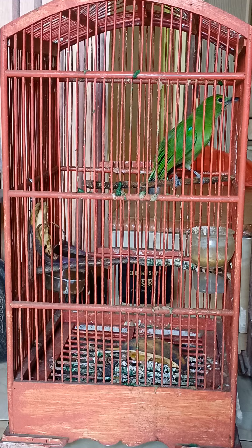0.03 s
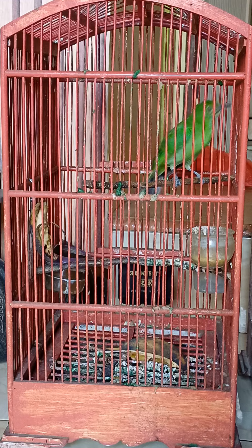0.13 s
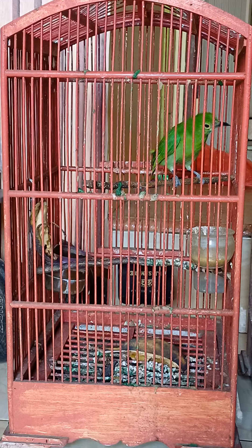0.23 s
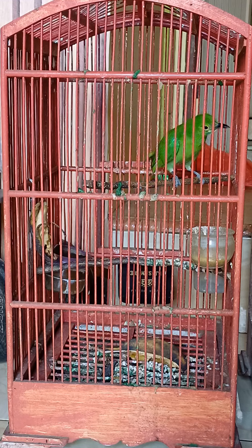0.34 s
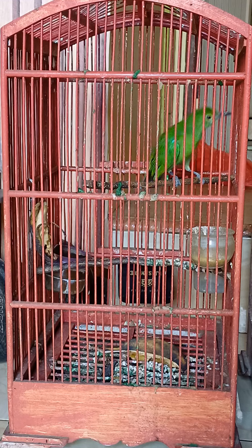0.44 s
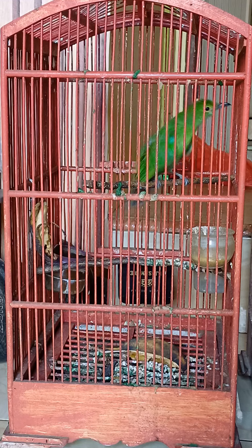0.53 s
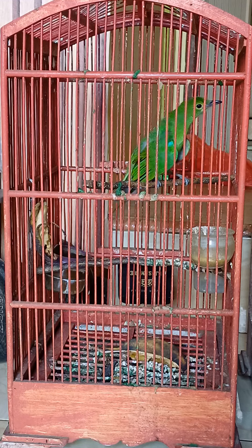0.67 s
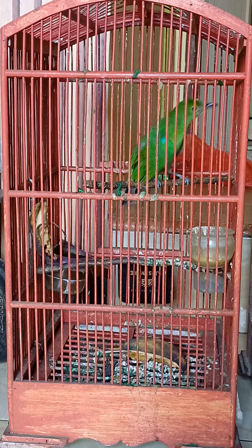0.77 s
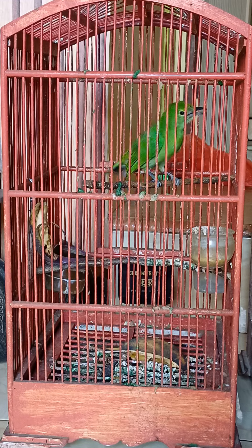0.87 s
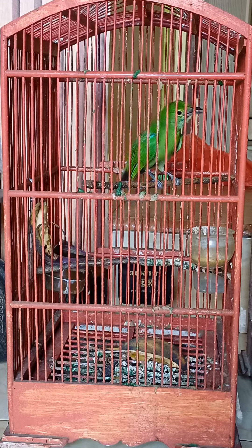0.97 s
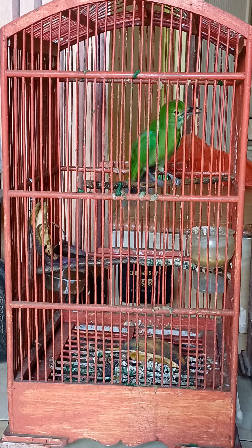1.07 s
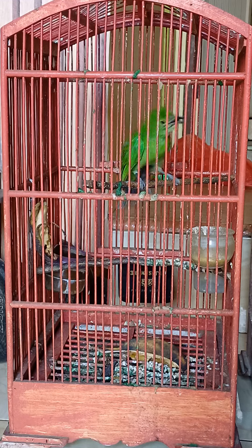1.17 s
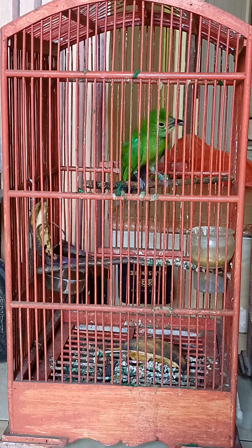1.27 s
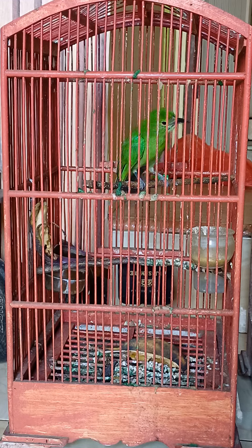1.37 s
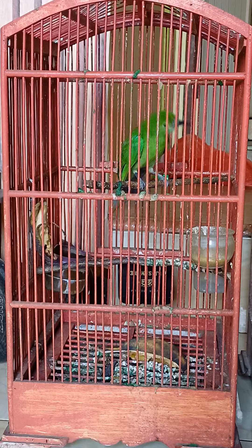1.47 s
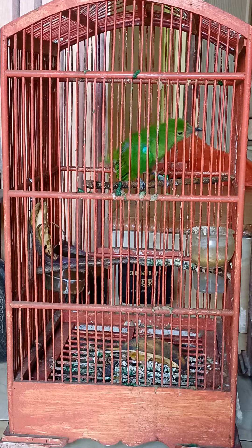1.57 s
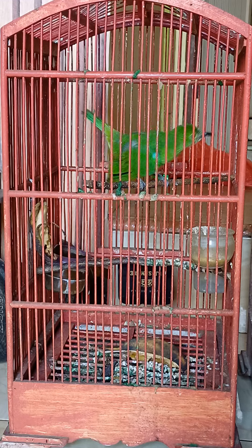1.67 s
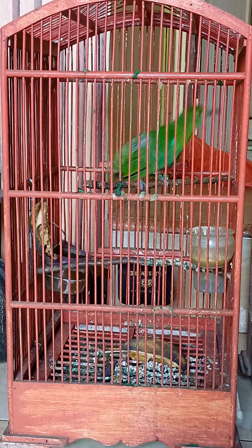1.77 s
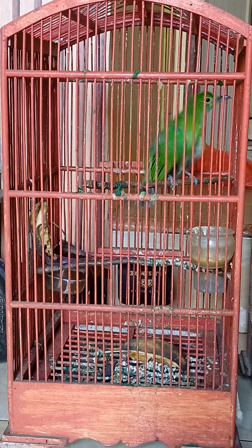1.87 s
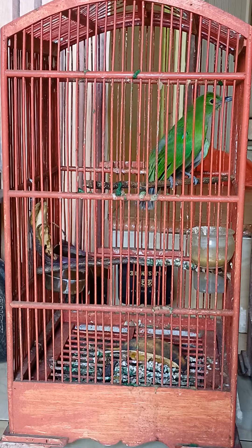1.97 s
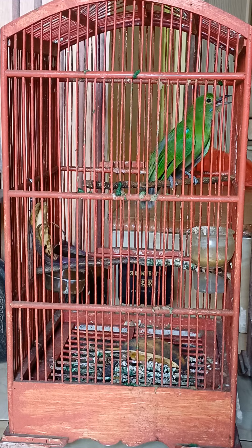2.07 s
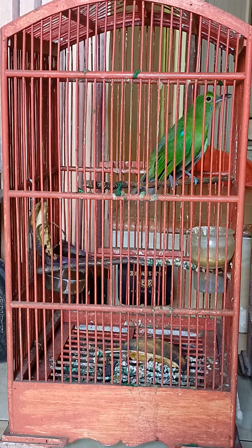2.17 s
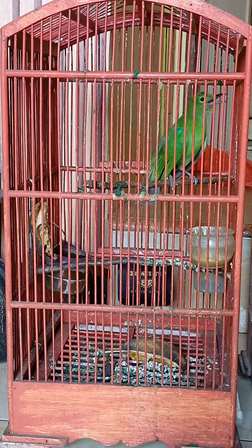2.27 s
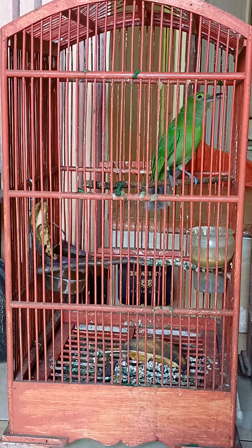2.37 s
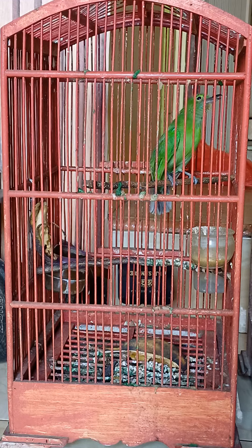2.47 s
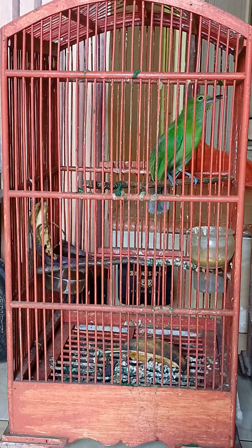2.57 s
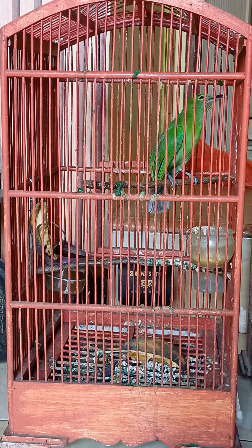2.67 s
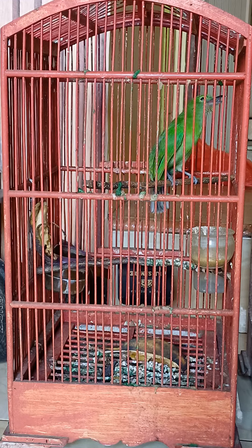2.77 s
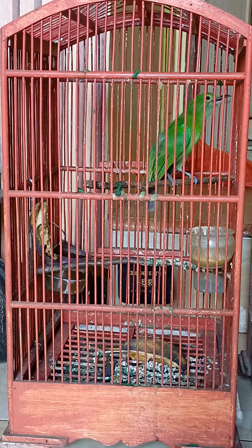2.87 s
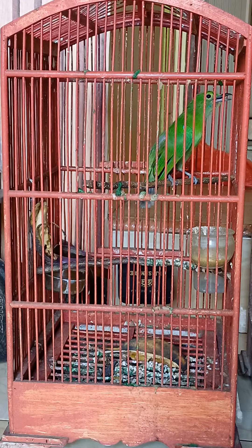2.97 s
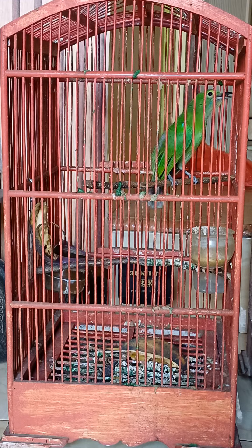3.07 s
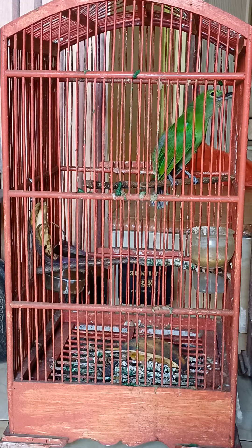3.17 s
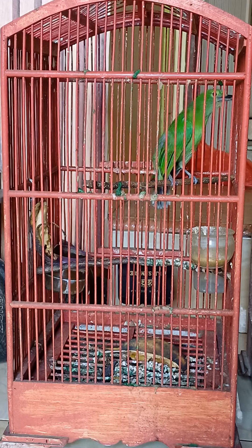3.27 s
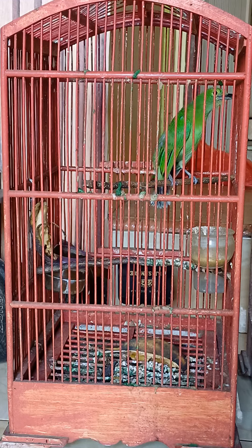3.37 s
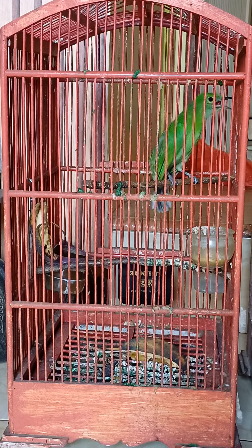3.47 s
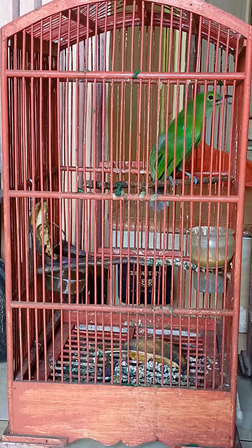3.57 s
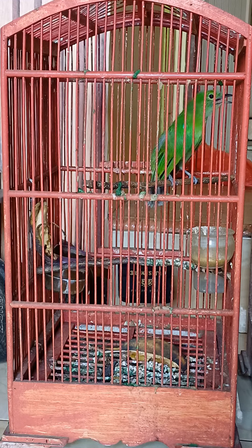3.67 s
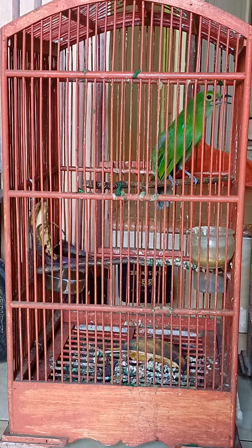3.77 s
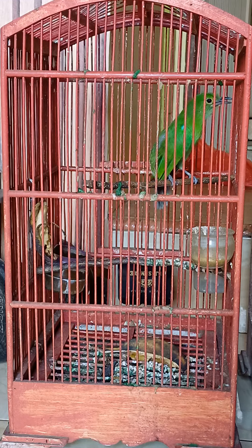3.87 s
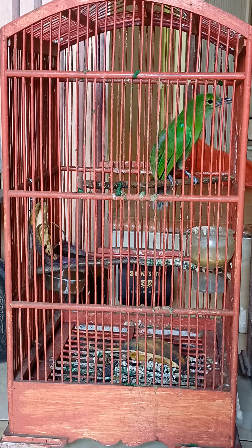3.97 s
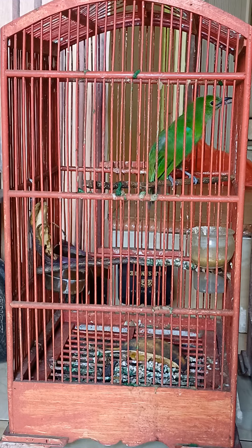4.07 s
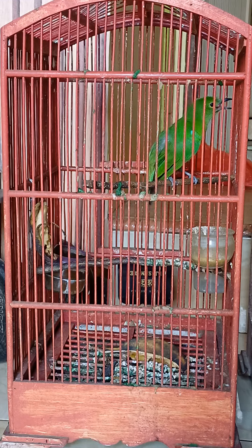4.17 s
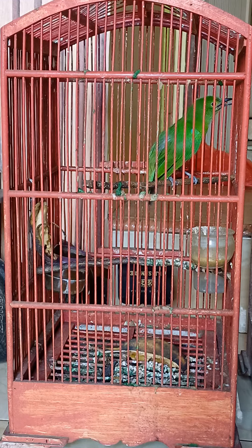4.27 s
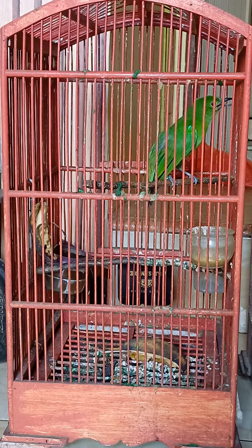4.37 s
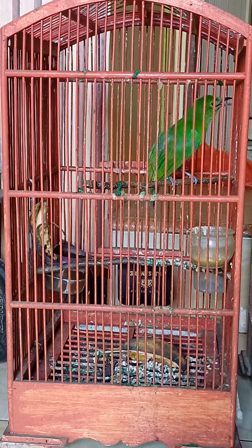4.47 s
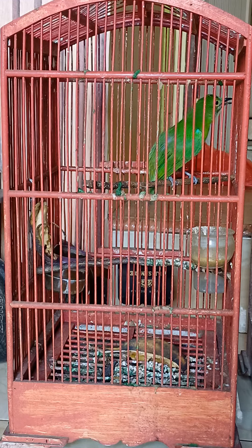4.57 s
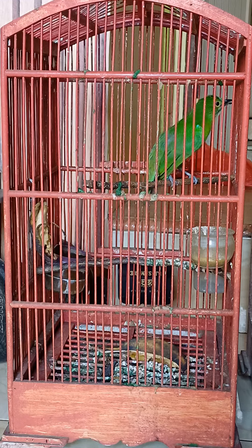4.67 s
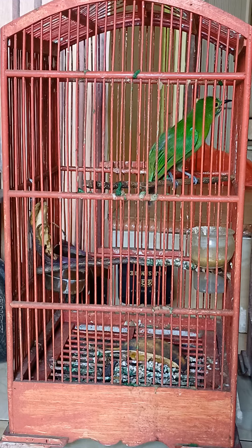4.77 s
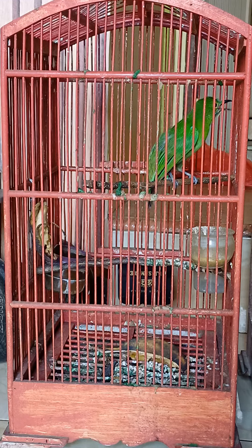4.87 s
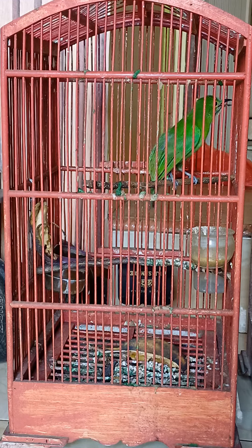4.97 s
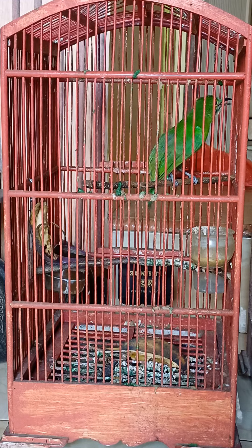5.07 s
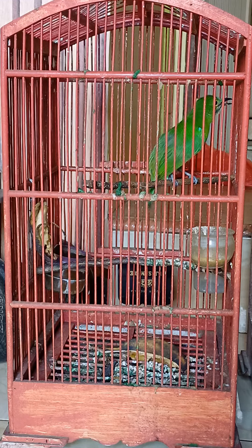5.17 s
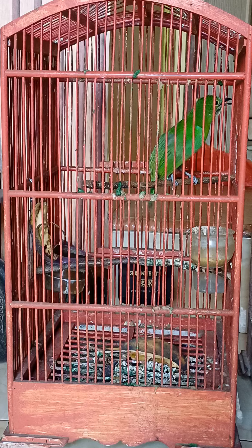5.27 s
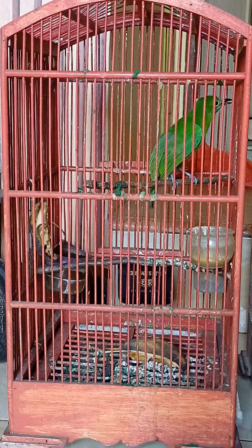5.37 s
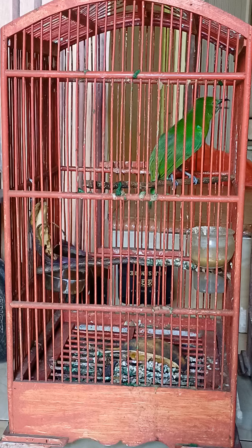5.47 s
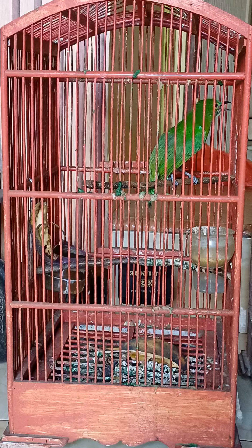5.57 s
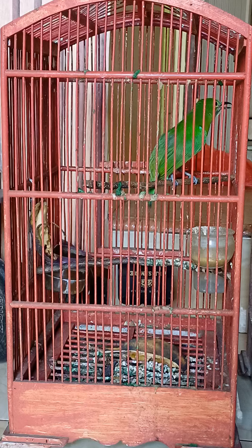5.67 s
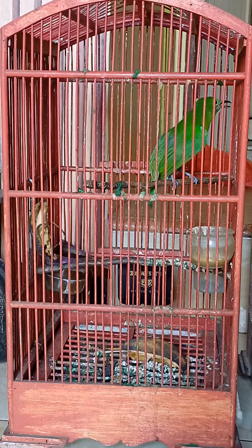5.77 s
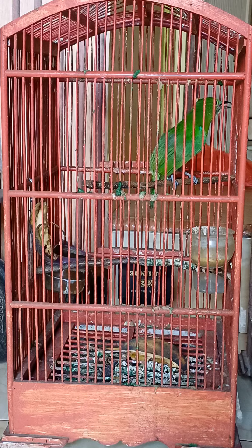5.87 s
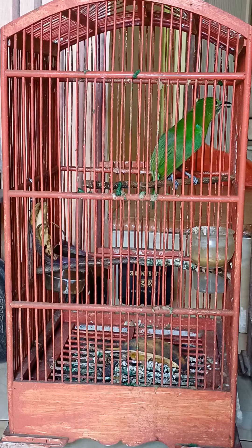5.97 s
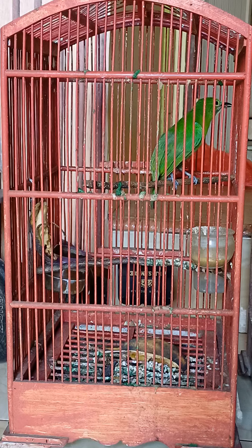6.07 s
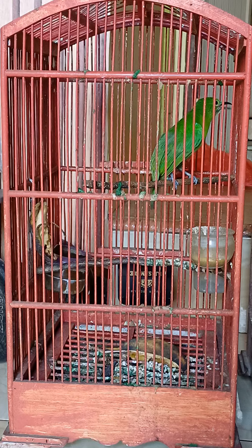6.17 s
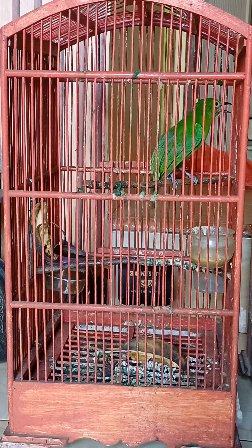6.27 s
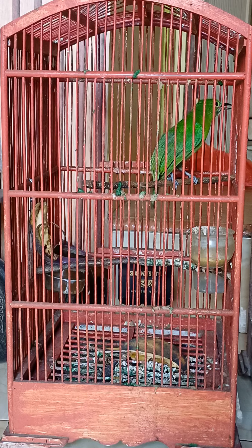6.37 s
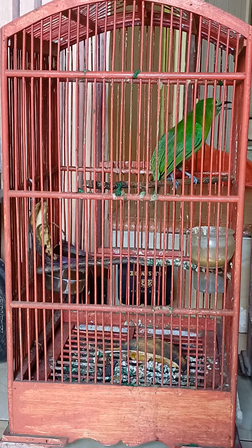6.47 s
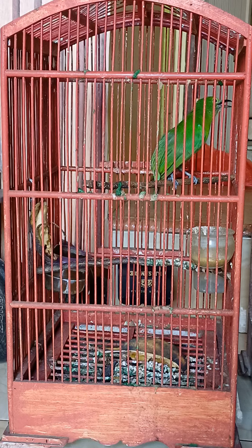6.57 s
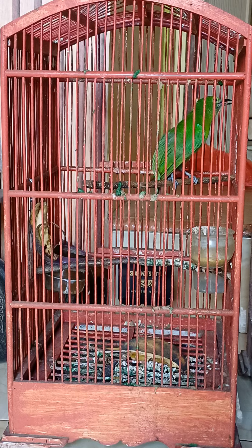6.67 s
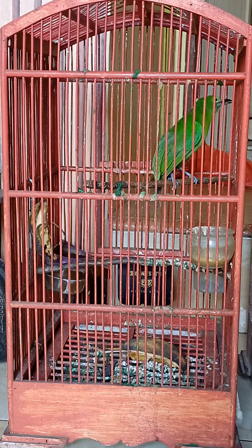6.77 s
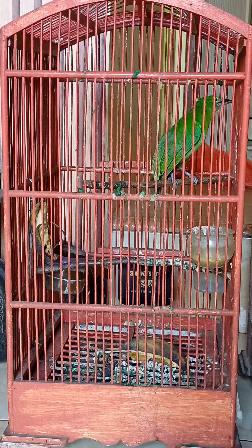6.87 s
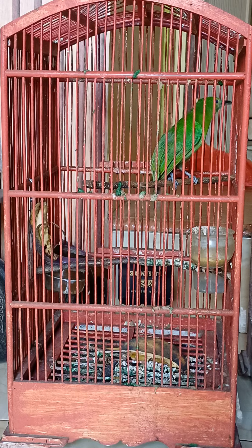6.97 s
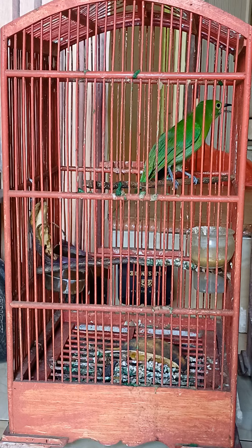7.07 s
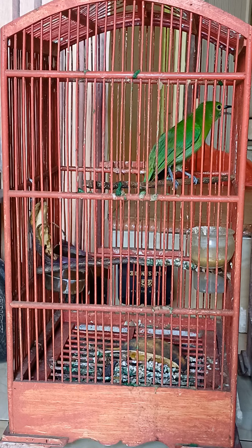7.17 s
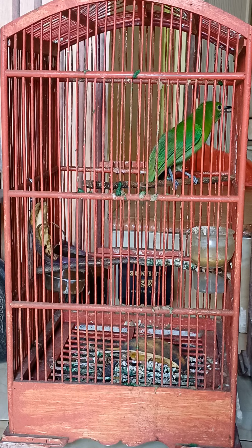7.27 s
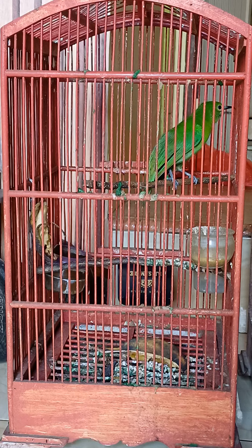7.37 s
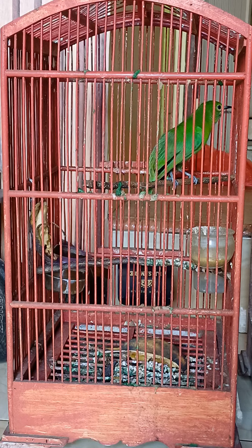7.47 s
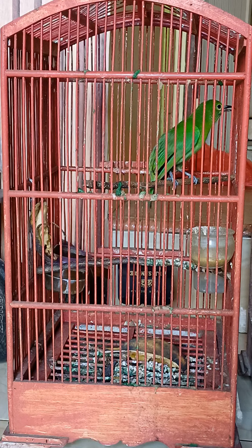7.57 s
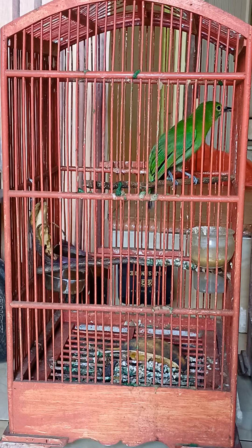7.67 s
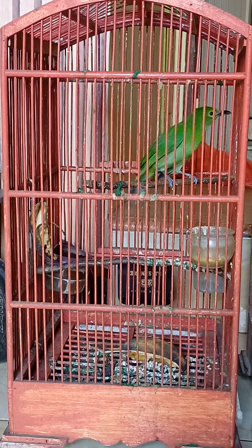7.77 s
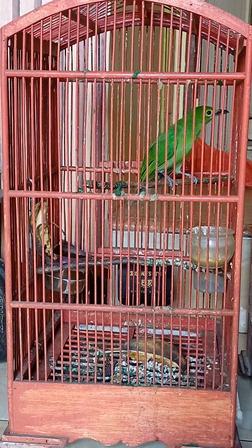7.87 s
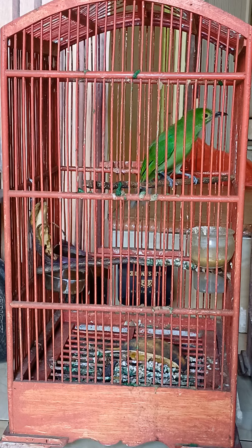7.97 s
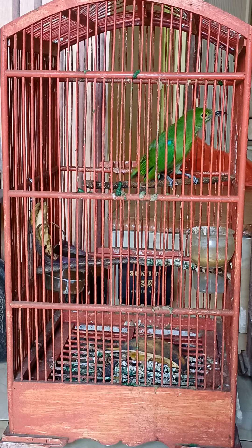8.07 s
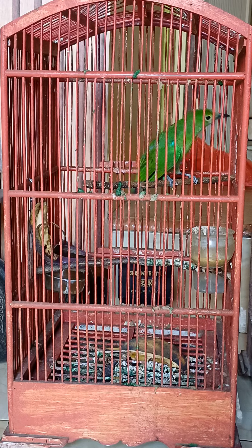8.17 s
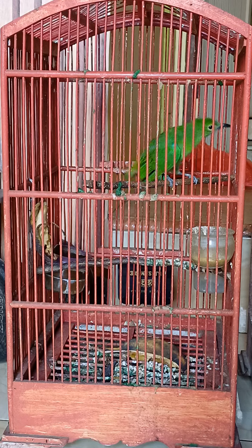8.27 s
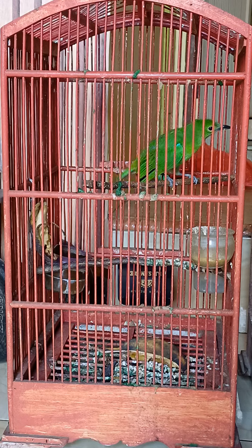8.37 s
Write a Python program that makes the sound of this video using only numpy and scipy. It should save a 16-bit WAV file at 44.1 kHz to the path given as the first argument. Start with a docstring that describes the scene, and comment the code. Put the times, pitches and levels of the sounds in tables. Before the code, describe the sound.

Close, sharp songbird phrases, each a buzz, a short chirp and a falling whistle, repeat steadily with a slight porch echo.

```python
"""A caged songbird, close to the microphone by a house wall, repeats one phrase: a rising buzz from
both sides of its syrinx, a short harsh chirp, then a clear whistled flourish. The porch rings after
each note, an earlier call dies away at the start, and a claw taps the perch. Far traffic hums below,
with a faint hiss. The microphone is a small one with a bright treble peak; the loudest notes
overload it, with a soft low thump in each whistle's slide."""
import sys
import numpy as np
from scipy import signal
from scipy.fft import rfft, irfft
from scipy.io import wavfile
from scipy.ndimage import uniform_filter1d

SR = 44100
rng = np.random.default_rng(int(sys.argv[2]) if len(sys.argv) > 2 else 0)


def int16_out(signal):
    """Quantize to a 16-bit WAV file."""
    q = np.round(np.clip(np.atleast_2d(signal).T, -1, 1) * 32767)
    wavfile.write(sys.argv[1], SR, q.astype(np.int16))


N = 371322


def amp(db):
    """Decibels to amplitude."""
    return 10 ** (np.asarray(db) / 20)


def at_hz(points, hz):
    """Read a (Hz, value) table on a log-frequency axis."""
    p = np.array(points)
    return np.interp(np.log(np.maximum(hz, 1)), np.log(p[:, 0]), p[:, 1])


def read(rows, at):
    """Interpolate a table's other columns along its first."""
    place, *columns = np.transpose(rows)
    return [np.interp(at, place, c) for c in columns]


def colour(x, spectrum):
    """Shape a sound by a (Hz, dB) table."""
    return irfft(rfft(x) * amp(at_hz(spectrum, np.fft.rfftfreq(len(x), 1 / SR))), len(x))


def noise(spectrum, n):
    """Noise of the given colour, rms 1."""
    x = colour(rng.standard_normal(n), spectrum)
    return x / x.std()


def narrow_noise(hz, width):
    """A narrow band of noise, rms 1."""
    band = signal.butter(2, [hz - width / 2, hz + width / 2], "band", fs=SR, output="sos")
    x = signal.sosfilt(band, rng.standard_normal(N + SR))[SR:]
    return x / x.std()


def wobble(n, hz):
    """Random drift, mostly slower than hz, with spread 1."""
    lowpass = signal.butter(2, hz, fs=SR, output="sos")
    x = signal.sosfilt(lowpass, rng.standard_normal(n + 2000))[2000:]
    return x / x.std()


def phase(hz):
    """Running phase of a pitch curve, from a random start."""
    return 2 * np.pi * (np.cumsum(hz) / SR + rng.random())


def add(out, start, x, fade_s=0.0018):
    """Mix a sound in with soft ends."""
    i, t = round(start * SR), np.arange(len(x)) / SR
    out[i:i + len(x)] += x * np.clip(np.minimum(t, t[::-1]) / fade_s, 0, 1)


# The far road, heard from the porch. Each row: time in seconds, level in dB.
TRAFFIC_LEVEL = [(0.0, -52.5), (0.52, -64), (0.96, -57), (1.1, -50.5), (1.43, -52), (1.85, -47.5),
                 (2.44, -51), (2.86, -49.5), (3.12, -54), (5.18, -56.5), (6.38, -54), (6.71, -56.5),
                 (7.2, -52), (8.42, -57)]
# The faint hiss behind the bird. Each row: time in seconds, level in dB.
HISS_LEVEL = [(0, -55.5), (.3, -67.5), (.6, -75), (.9, -73), (1.5, -62), (2.1, -60.5), (3, -61), (8, -64),
              (8.42, -73.5)]
# Colours of traffic, rumble and hiss. Each row: frequency in Hz, relative density in dB.
TRAFFIC_SPECTRUM = [(74, -30.5), (125, -17.5), (151, 1), (193, -4), (274, -5), (337, -4), (387, -6),
                    (750, -8), (1530, -11), (2920, -16.5), (8000, -36), (10400, -63.5), (17600, -120)]
RUMBLE_SPECTRUM = [(15, -32), (25, -17), (81, -1), (125, -2.5), (160, -44.5), (280, -120)]
HISS_SPECTRUM = [(1760, -30), (3000, -2.5), (5250, 2), (14200, -2.5), (15100, -25), (16000, -28)]
# One distant engine. Each row: centre in Hz, width in Hz, dB against the traffic when near, when far.
ENGINE_BANDS = [(153, 8, -6, -8), (186, 10, -11, -11), (275, 6, -8, -22), (318, 7, -9, -20),
                (392, 10, -12, -22)]
# Times in seconds at which it starts to approach, is near, starts to leave and is far again.
ENGINE_PASS_S = (1.2, 1.6, 2.7, 3.3)


def outdoors():
    """Far traffic with one passing engine, a rumble that partly follows its swell, and hiss."""
    t = np.arange(N) / SR
    traffic_db, = read(TRAFFIC_LEVEL, t)
    hiss_db, = read(HISS_LEVEL, t)
    engine = sum(amp(np.interp(t, ENGINE_PASS_S, [far, near, near, far])) * narrow_noise(hz, width)
                 for hz, width, near, far in ENGINE_BANDS)
    rumble_db = -61.5 + 0.6 * (traffic_db - traffic_db.mean()) + 2.5 * wobble(N, 5)
    traffic = amp(traffic_db + 0.57 * wobble(N, 8.8)) * (noise(TRAFFIC_SPECTRUM, N) + engine)
    rumble = amp(rumble_db) * noise(RUMBLE_SPECTRUM, N)
    return rumble + traffic + amp(hiss_db) * noise(HISS_SPECTRUM, N)


# A call still ringing in the porch. Each row: centre in Hz, width in Hz, level in dB,
# seconds to fall 60 dB.
RINGING_BANDS = [(2958, 26, -30, 0.46), (2780, 460, -44.5, 0.53), (4650, 570, -35.5, 0.51),
                 (5170, 120, -39, 0.29)]


def earlier_call():
    """Narrow bands of reverberation, already decaying."""
    t = np.arange(N) / SR
    return sum(amp(db - 60 * t / t60) * narrow_noise(hz, width) for hz, width, db, t60 in RINGING_BANDS)


# Faint taps inside the cage. Each row: start in seconds, level in dB, ring pitch in Hz.
CLAW_TAPS = [(.655, -46, 244), (7.856, -40.5, 238), (7.941, -43, 450)]


def claw_taps():
    """A claw knocks the perch: a low ring under a brief scratch."""
    out, t = np.zeros(N), np.arange(2000) / SR
    for start, db, hz in CLAW_TAPS:
        ring = np.sin(2 * np.pi * hz * t) * amp(-60 * t / 0.12)
        scratch = 0.42 * wobble(len(t), 3000) * amp(-60 * t / 0.0354)
        add(out, start, amp(db) * (ring + scratch))
    return out


def membranes(angle, harmonics_db, bright_db, flicker_db):
    """The membranes close unevenly, adding flickering harmonics; bright_db acts from the third up."""
    tone = 0
    for k, db in enumerate(harmonics_db):
        flicker = flicker_db * min(k / 2, 1) * wobble(len(angle), 70)
        tone += amp(db + bright_db * (k > 1) + flicker) * np.sin((k + 1) * angle)
    return np.sqrt(2) * tone


# The bird's breath, heard close. Each row: frequency in Hz, relative density in dB.
BREATH_SPECTRUM = [(1000, -50.5), (1700, -24.5), (4000, 14), (6000, -5), (8000, -8), (12000, -19),
                   (16000, -12)]


def breath():
    """Air rushing past the syrinx, the rasp in every note."""
    return noise(BREATH_SPECTRUM, N)


# The two sides of the syrinx in a buzz. Each row: seconds into the voice, base pitch in Hz,
# warble depth in Hz, relative level in dB.
UPPER_VOICE = [(0, 2087, 102, -29), (.007, 2862, 260, -12), (.018, 3397, 370, -4.5),
               (.035, 3850, 420, -1.3), (.06, 4388, 480, -0.5), (.09, 5000, 497.3, -4.5),
               (.12, 5453, 470, -9.5), (.15, 5650, 450, -6.5)]
LOWER_VOICE = [(0, 1590, 79.5, -27.5), (.012, 1782, 110.7, -7.5), (.04, 2000, 130, -2),
               (.055, 2600, 169.2, -5.5), (.066, 3345, 100, -3.5), (.095, 3700, 71.2, 0.2),
               (.15, 3913, 80, -3.8)]
# Their harmonics in dB, fundamental first.
UPPER_HARMONICS = [0, -31.5, -40.5]
LOWER_HARMONICS = [4, -21, -25, -30.5]
# The buzz that opens each phrase. Each row: start and length in seconds, upper pitch factor, upper and
# lower level in dB, warbles per second at onset, brightness in dB, top treble at the microphone in dB.
BUZZES = [(0.906, 0.06, 0.95, -7, -24, 152, 1, -11.5), (2.124, 0.07, 0.92, -7.5, -25, 175, -0.5, -4),
          (2.829, 0.14, 0.89, -7, -19.5, 133, 3.5, -7), (3.49, 0.15, 0.94, -7, -18.5, 156, 1.5, 10.5),
          (4.165, 0.13, 0.93, -6.5, -19, 169, 3.5, -1), (4.841, 0.14, 0.92, -6, -20.5, 157, 5, -2),
          (5.525, 0.14, 0.92, -6.5, -21, 140, 5, 0.5), (6.262, 0.15, 0.92, -7.5, -22, 142, 4, -6),
          (7.127, 0.15, 0.93, -10, -20.5, 183, 1, -5)]
TREMOR_SLOWING_HZ_PER_S, LOWER_DELAY_S, JUMP_DB, BUZZ_FADE_S = 250, 0.0055, 4.5, 0.018


def buzzes(rasp):
    """Both sides of the syrinx climb; a fast tremor swings the upper, the lower jumps and strengthens."""
    out = np.zeros(N)
    for start, length, pitch, upper_db, lower_db, tremor_hz, bright_db, _ in BUZZES:
        t = np.arange(round(length * SR)) / SR
        slowing_hz = tremor_hz - TREMOR_SLOWING_HZ_PER_S * t
        tremor = np.sin(phase(slowing_hz * (1 + 0.07 * wobble(len(t), 60))))
        upper_hz, upper_depth, upper_shape_db = read(UPPER_VOICE, t)
        lower_hz, lower_depth, lower_shape_db = read(LOWER_VOICE, t - LOWER_DELAY_S)
        jump_db = np.interp(lower_hz, [2200, 3200], [0, JUMP_DB])
        upper_level = amp(upper_db + upper_shape_db + 0.43 * tremor + 2.0 * wobble(len(t), 210))
        lower_level = amp(lower_db + jump_db + lower_shape_db + 2.5 * wobble(len(t), 300))
        upper_angle = phase(pitch * upper_hz + upper_depth * (tremor + 0.17 * wobble(len(t), 400)))
        lower_angle = phase(lower_hz + lower_depth * wobble(len(t), 350))
        upper = upper_level * membranes(upper_angle, UPPER_HARMONICS, bright_db, flicker_db=-2.5)
        lower = lower_level * membranes(lower_angle, LOWER_HARMONICS, bright_db, flicker_db=3)
        # a faint tone at the sum of the two pitches
        sum_level = amp(-19.5 + 4.5 * wobble(len(t), 80)) * np.sqrt(upper_level * lower_level)
        sum_tone = sum_level * np.sin(upper_angle + lower_angle)
        air_level = (upper_level + lower_level) * amp(-21 + bright_db + 1.9 * tremor)
        air = air_level * rasp[round(start * SR):][:len(t)]
        fade = np.clip((length - t) / BUZZ_FADE_S, 0, 1)
        add(out, start, (upper + lower + sum_tone + air) * fade)
    return out


# High hiss on buzzes and chirps: centre in Hz, width in Hz, level against the note in dB.
SHEEN_BAND = (14600, 1600, -35.5)


def sheen(voice):
    """A thin, flickering hiss that follows the loudness of the voice."""
    hz, width, db = SHEEN_BAND
    envelope = uniform_filter1d(np.abs(voice), size=200)
    return amp(db + 4.9 * wobble(N, 40)) * envelope * narrow_noise(hz, width)


# The arch of a chirp. Each row: share of its length, base pitch in Hz, relative level in dB.
CHIRP_SHAPE = [(0, 1200, -17), (.1, 1445, -6), (.3, 1685, -0.7), (.55, 1840, 0.7), (.8, 1865, -3.2),
               (1, 1713, -20.5)]
# Its harmonics in dB, fundamental first.
CHIRP_HARMONICS = [-13, 2, -21.5, -32.5, -35.5, -41, -48, -46]
# The chirp in mid-phrase. Each row: start and length in seconds, pitch factor, level in dB,
# swell from onset to end in dB, warble depth in Hz, brightness in dB.
CHIRPS = [(1.068, 0.062, 0.98, -10, 5.6, 80.4, -2.1), (2.318, .066, 1.007, -7, -3.5, 100, -0.3),
          (3.038, 0.069, 0.97, -11, 4, 40, 0), (3.691, 0.06, 0.97, -13.5, 7.5, 50, 1.5),
          (4.373, 0.06, 0.96, -14.5, 9.5, 50, 4), (5.052, 0.063, 0.95, -15, 9.5, 60, 5.5),
          (5.755, .064, .98, -12.5, 4.5, 60, 0.5), (6.488, 0.072, 0.96, -12.5, 2, 60.3, 3.5),
          (7.355, 0.068, 0.95, -12.5, 2, 54.8, 3.5)]
CHIRP_WARBLE_HZ = 149.6


def chirps(rasp):
    """One low, harsh voice whose second harmonic the throat favours."""
    out = np.zeros(N)
    for start, length, pitch, db, swell_db, depth_hz, bright_db in CHIRPS:
        t = np.arange(round(length * SR)) / SR
        base_hz, shape_db = read(CHIRP_SHAPE, t / length)
        warble_hz = depth_hz * np.sin(2 * np.pi * CHIRP_WARBLE_HZ * t)
        hz = pitch * base_hz + warble_hz + 36 * wobble(len(t), 400)
        air = amp(-24 + bright_db) * rasp[round(start * SR):][:len(t)]
        level = amp(db + swell_db * t / length + shape_db + 1.5 * wobble(len(t), 190))
        tone = membranes(phase(hz), CHIRP_HARMONICS, bright_db, flicker_db=-0.5)
        add(out, start, level * (tone + air))
    return out


# A whistle's two parts. Each row: place (0 onset, 1 top, 2 dip, 3 end), base pitch in Hz,
# relative level in dB, unsteadiness from 0 to 1.
HELD_NOTE = [(0, 1913, -24, .2), (.1, 2451, -7.5, 0.087), (.18, 2558, -4, .05), (.4, 2419, -1.1, 0.038),
             (.63, 2440, -2, .05), (.72, 2242, -0.5, .3), (.8, 2238, -23.5, 0.54)]
FLOURISH = [(.88, 2786, -7, 1), (0.971, 3338, 7.5, 0.66), (1, 3542, -10, .6), (1.029, 3322, 4.5, 0.49),
            (1.149, 3060, 4.5, 0.27), (1.399, 2691, 3.5, .1), (1.518, 2514, -10, 0.4),
            (1.701, 2565, 0.5, 0.083), (1.92, 2083, -3, 0.18), (2.099, 2057, -1.5, 0.12),
            (2.379, 2534, 3, 0.23), (2.85, 2593, -3, 0.36), (3, 2510, -29, 0.99)]
# Its harmonics in dB, fundamental first.
WHISTLE_HARMONICS = [2.5, -24, -31.5, -35, -34.5, -29.5, -44]
# The whistle that ends each phrase. Each row: start in seconds, seconds from there to top, dip and end,
# pitch factor and dB of the held note, the same of the flourish, then brightness, top treble at the
# microphone and overload thump level, all in dB.
WHISTLES = [(1.173, 0.072, 0.17, 0.2, .99, -4, 1.018, -6.5, -6.5, 4.5, -37.5),
            (2.439, 0.073, 0.17, 0.22, .99, -5.5, 1.023, -7, -6.5, 11, -39),
            (3.131, 0.073, 0.17, .2, .995, -5.5, .98, -9, -7, 8, -43.5),
            (3.787, .078, .17, 0.22, 1.008, -6, 0.99, -8.5, -3.5, 5.5, -43),
            (4.474, .079, 0.17, .22, 1.008, -6, 1.001, -8, -3.5, 5.5, -40.5),
            (5.155, 0.07, .17, 0.23, 1.015, -5.5, 1.024, -9.5, -2, 4.5, -38.5),
            (5.862, 0.074, .182, 0.23, 1.001, -6.5, 1.005, -9.5, -5, -3, -40.5),
            (6.6, .08, .174, .215, .99, -5.5, 0.99, -9.5, -6.5, -1, -39),
            (7.472, 0.074, 0.16, .22, 1, -6.5, 1.015, -9, -3.5, -2, -40)]
SLIDE_PLACE, SLIDE_WIDTH, SLIDE_DB = 1.2, 0.2, 11.5   # overtones peak with the effort in the slide


def whistles(rasp):
    """One clear voice: a held note, a cracking leap, a falling slide, a dip and a short recovery."""
    out = np.zeros(N)
    for start, top, dip, end, held_pitch, held_db, leap_pitch, leap_db, tone_db, *_ in WHISTLES:
        t = np.arange(round(end * SR)) / SR
        place = np.interp(t, [0, top, dip, end], range(4))
        base_hz, shape_db, shaky = read(HELD_NOTE + FLOURISH, place)
        leapt = place > HELD_NOTE[-1][0]
        effort_db = SLIDE_DB * np.exp(-((place - SLIDE_PLACE) / SLIDE_WIDTH) ** 2)
        bright_db = tone_db + 0.4 * shape_db - 8 * shaky + effort_db
        hz = uniform_filter1d(np.where(leapt, leap_pitch, held_pitch) * base_hz, size=60)
        hz += 160 * shaky * wobble(len(t), 150)
        falter_db = 1.1 * shaky * np.abs(wobble(len(t), 150))
        level = amp(shape_db + np.where(leapt, leap_db, held_db) - falter_db)
        air = amp(-44 + 28 * shaky + bright_db) * rasp[round(start * SR):][:len(t)]
        tone = membranes(phase(hz), WHISTLE_HARMONICS, bright_db, flicker_db=5.5)
        add(out, start, level * (tone + air))
    return out


# The thump of the overloaded microphone. Each row: frequency in Hz, relative density in dB.
THUMP_SPECTRUM = [(30, -16.5), (60, 5), (150, -15), (500, -12), (1200, -35), (3000, -46)]
THUMP_AFTER_TOP_S, THUMP_S = 0.012, 0.031


def overload_thumps():
    """A soft low thump as each whistle's slide overloads the microphone, played as a burst of noise."""
    out, n = np.zeros(N), round(THUMP_S * SR)
    for start, top, *_, db in WHISTLES:
        add(out, start + top + THUMP_AFTER_TOP_S, amp(db) * np.hanning(n) * noise(THUMP_SPECTRUM, n))
    return out


# The path through windpipe and beak. Each row: frequency in Hz, gain in dB.
THROAT_RESPONSE = [(1000, -11.5), (1550, -1.5), (5000, -2), (6500, -3.5), (7500, -2.5), (8700, 0),
                   (9400, 1.5), (10300, 6.5), (11300, 7), (12800, 0.5), (13800, 6), (14700, 5),
                   (15600, -1.5)]
BEAM_HZ = 13300


def throat_and_beak(voice):
    """The throat colours the song; the top treble varies from note to note, as when the beak turns."""
    song = colour(voice, THROAT_RESPONSE)
    aims = [(start + length / 2, db) for start, length, *_, db in BUZZES]
    aims += [(start + top, db) for start, top, *_, db, _ in WHISTLES]
    treble_db, = read(sorted(aims), np.arange(N) / SR)
    treble = colour(song, [(BEAM_HZ * 0.95, -40), (BEAM_HZ * 1.05, 0)])
    return song + (amp(treble_db) - 1) * treble


# The porch around the cage. Each row: frequency in Hz, seconds to fall 60 dB.
PORCH_DECAY = [(1000, 0.25), (2500, 0.63), (5000, 0.44), (10000, 0.51), (16000, .22)]
PORCH_DB, PORCH_GAP_S = -11, 0.0013


def porch(song):
    """Dense echoes after a short gap, ringing longest near 2.5 kHz."""
    t, echo = np.arange(SR) / SR, 0
    edges = np.geomspace(500, 18000, 11)
    for low, high in zip(edges, edges[1:]):
        bandpass = signal.butter(2, [low, high], "band", fs=SR, output="sos")
        decay = amp(-60 * t / at_hz(PORCH_DECAY, np.sqrt(low * high)))
        band = signal.sosfilt(bandpass, rng.standard_normal(SR)) * decay * (t > PORCH_GAP_S)
        echo += band * np.sqrt((high - low) / (SR / 2) / np.sum(band ** 2))   # equal energy per Hz
    return amp(PORCH_DB) * signal.fftconvolve(song, echo)[:N]


def scene():
    """The bird close by in the porch, the traffic far behind, in mono."""
    rasp = breath()
    rough_notes = buzzes(rasp) + chirps(rasp)
    bird = throat_and_beak(rough_notes + sheen(rough_notes) + whistles(rasp))
    return (bird + porch(bird) + earlier_call() + claw_taps() + overload_thumps() + outdoors())[None]


# The treble peak of the microphone port: centre in Hz, width in Hz, gain in dB.
PORT_PEAK = (14800, 2200, 4)
BASS_CUT_HZ, TOP_CUT_HZ = 38, 16000
LIMITER_CEILING, OVERLOAD_CEILING = 0.76, 0.92   # shares of full scale


def record(dry):
    """A small microphone: port resonance, bass cut, fast limiter, rounded overload, steep top cut."""
    hz, width, db = PORT_PEAK
    resonance = signal.lfilter(*signal.iirpeak(hz, hz / width, fs=SR), dry)
    x = dry + (amp(db) - 1) * resonance
    x = signal.sosfilt(signal.butter(2, BASS_CUT_HZ, "high", fs=SR, output="sos"), x)
    envelope = np.sqrt(2 * uniform_filter1d(x ** 2, size=150) + 1e-12)
    limited = x / (1 + (envelope / LIMITER_CEILING) ** 8) ** (1 / 8)
    rounded = limited / (1 + np.abs(limited / OVERLOAD_CEILING) ** 6) ** (1 / 6)
    return signal.sosfilt(signal.cheby2(20, 70, TOP_CUT_HZ, fs=SR, output="sos"), rounded)


dry = scene()
out = record(dry)
int16_out(out)
```